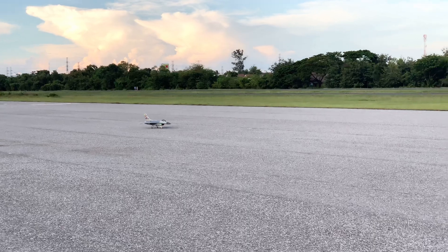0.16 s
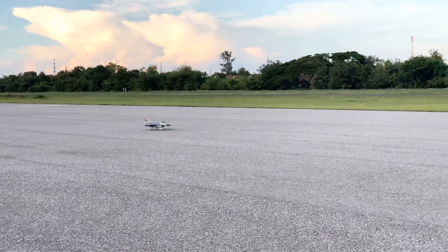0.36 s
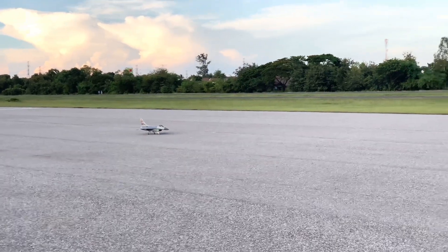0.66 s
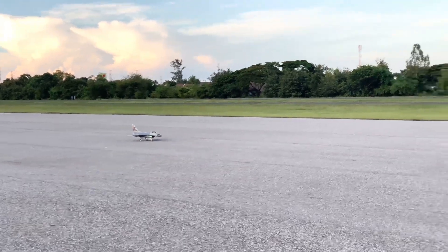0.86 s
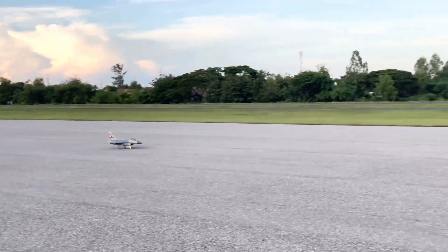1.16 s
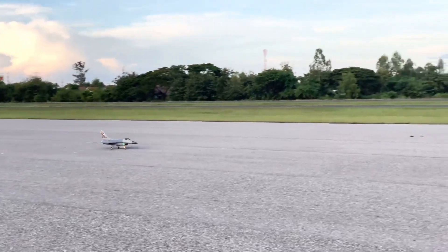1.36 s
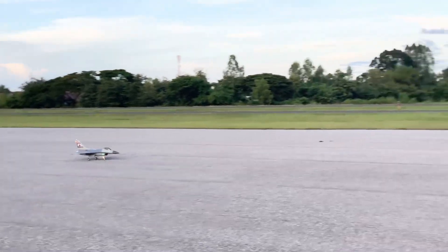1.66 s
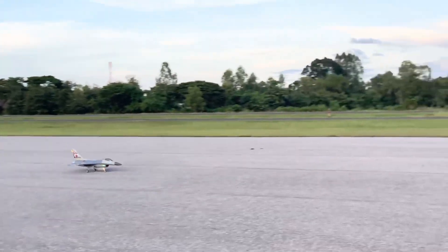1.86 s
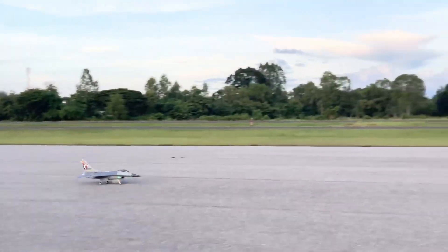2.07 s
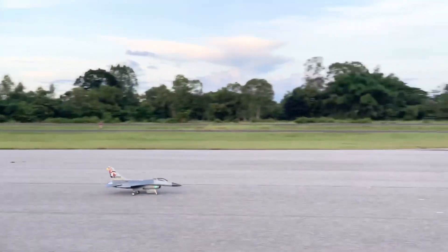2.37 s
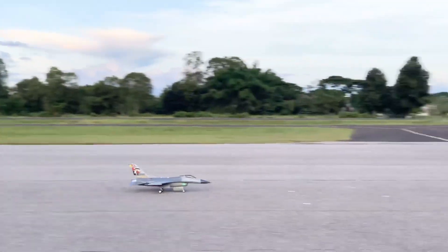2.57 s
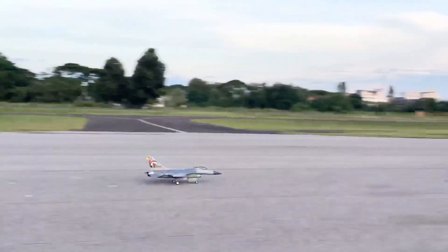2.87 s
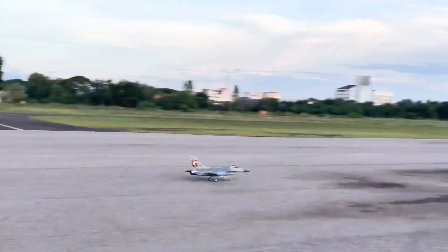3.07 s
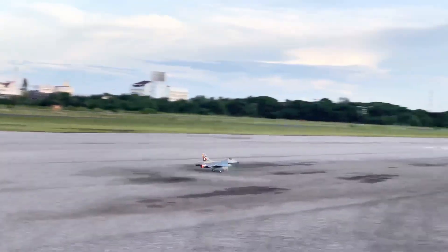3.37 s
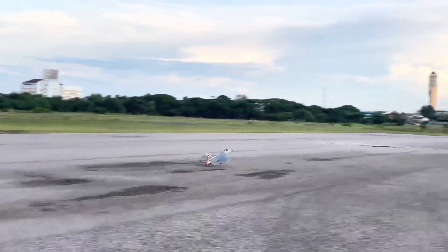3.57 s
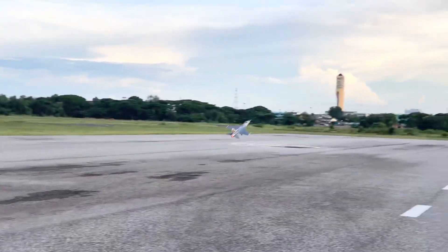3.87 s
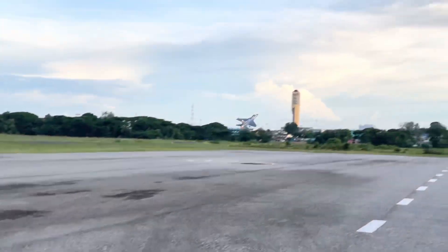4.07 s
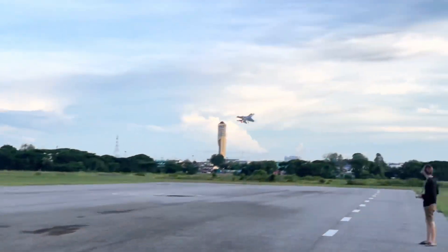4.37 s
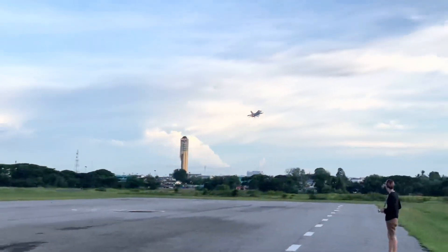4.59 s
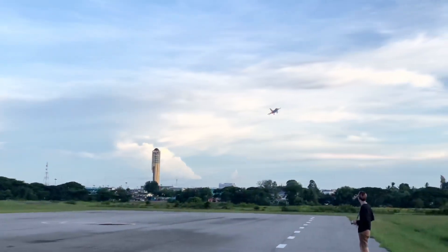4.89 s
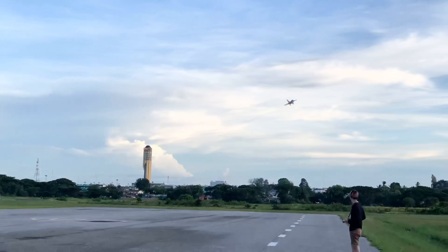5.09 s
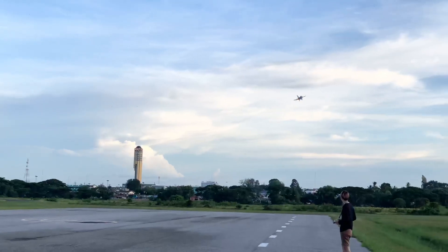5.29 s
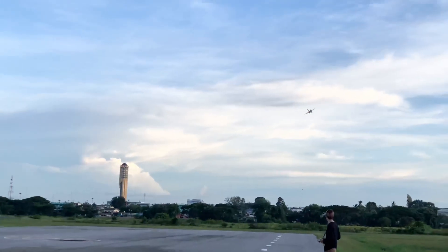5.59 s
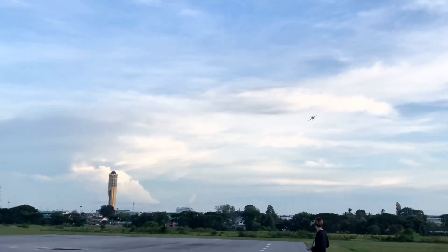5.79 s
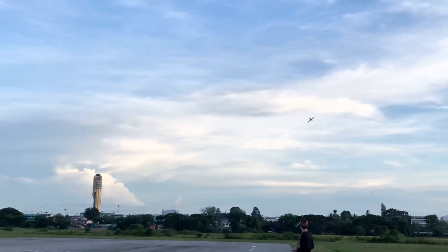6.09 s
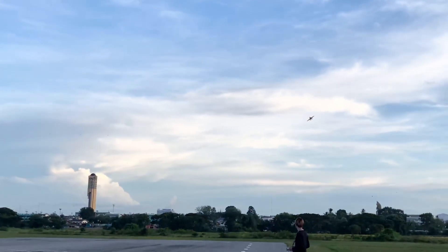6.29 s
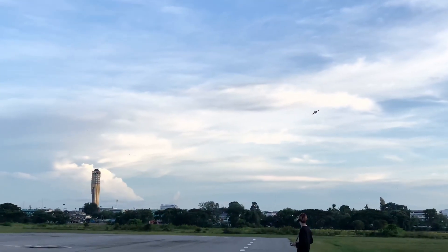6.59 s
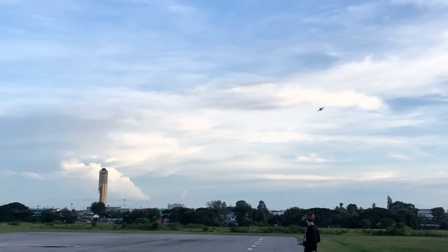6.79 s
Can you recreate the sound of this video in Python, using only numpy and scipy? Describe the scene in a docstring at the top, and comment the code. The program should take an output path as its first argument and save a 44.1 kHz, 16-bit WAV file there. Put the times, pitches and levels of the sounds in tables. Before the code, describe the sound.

A gust thumps the microphone at an open airfield. A model jet's ducted fan whines up in pitch over a rush of air, its tyres rumbling faintly on asphalt. It passes close with a piercing whistle and hiss, lifts off and fades into a hollow, sweeping roar. Wind buffets the hand-held microphone more strongly toward the end.

```python
"""A gust of wind thumps the microphone, then a model jet whines up to speed, rolls past and climbs away.
Its spinning shaft hums and its twelve fan blades whistle over exhaust roar, air rushing through the duct
and hiss from the blade tips. The tyres rumble on asphalt until lift-off. Then the echo from the ground
cancels some pitches and boosts others, so the jet sounds hollow. All along, wind buffets the hand-held
microphone, whose two openings (ports) give the left and right channels."""
import sys
import numpy as np
from scipy import signal
from scipy.io import wavfile
from scipy.ndimage import uniform_filter1d

SR = 44100
rng = np.random.default_rng(int(sys.argv[2]) if len(sys.argv) > 2 else 0)


def unload_wav(signal):
    """Save mono or channel-first audio to the path in sys.argv[1] as 16-bit WAV at rate SR, clipped to [-1, 1]."""
    wavfile.write(
        sys.argv[1],
        SR,
        np.round(np.clip(np.atleast_2d(signal).T, -1, 1) * 32767).astype(np.int16),
    )


N = 306406

# Tone colour of wind on the microphone (frequency [Hz], relative level [dB])
WIND_SPECTRUM = [(25, -21.5), (55, 9), (90, 1), (240, -9), (420, -20), (800, -33), (1200, -87)]
# The breeze between gusts (time [s], level [dB])
BREEZE_LEVEL = [(0, -41), (1, -41), (1.3, -39.5), (1.55, -43.5), (2.25, -42), (2.5, -77), (3.1, -49),
                (3.4, -43.5), (4.6, -42), (5.2, -29), (5.55, -42), (6.95, -33)]
# Gusts on the microphone (start [s], length [s], level [dB])
WIND_GUSTS = [(.01, 0.043, -21.5), (0.116, 0.051, -29.5), (0.257, 0.056, -36), (0.346, 0.067, -35),
              (0.566, 0.022, -29), (0.814, 0.084, -33), (1.227, 0.071, -33), (1.36, 0.14, -31.5),
              (1.611, 0.049, -30.5), (2.129, 0.036, -32.5), (2.303, 0.044, -27.5), (4.402, 0.09, -34),
              (4.664, 0.12, -27), (4.891, 0.073, -27), (5.035, 0.033, -19.5), (5.271, 0.064, -27.5),
              (5.428, 0.062, -36.5), (5.644, 1.28, -25.5), (5.765, 0.032, -27), (5.876, 0.21, -25),
              (6.307, 0.1, -25.5), (6.464, 0.07, -23.5), (6.61, 0.048, -20), (6.713, 0.099, -28)]
# Large eddies, swirls of air that burst on the microphone (time [s], relative level [dB], pitch [Hz])
BIG_EDDIES = [(1.438, -18, 287), (4.755, -16, 300), (4.876, -18, 298), (4.974, -16, 305),
              (5.212, -18.5, 280), (5.769, -16, 185), (5.843, -18.5, 258), (6.014, -9, 295),
              (6.198, -15.5, 304), (6.475, -16, 296), (6.559, -12.5, 372), (6.645, -11, 203),
              (6.731, -12.5, 265)]
# How fast the shaft turns, as heard (time [s], speed [Hz])
SHAFT_SPEED = [(0, 296), (.2, 375), (.35, 414), (.55, 466), (.72, 507), (1.1, 569), (1.3, 591.5),
               (1.45, 621), (1.64, 674), (1.85, 691), (2.05, 724), (2.25, 729), (2.45, 724), (3.3, 686),
               (3.7, 675.5), (4.45, 669.5), (4.68, 637), (4.9, 631), (5.4, 627), (5.98, 603.5),
               (6.95, 599.6)]
# Tone colours of exhaust, duct air, blade tips and tyres (frequency [Hz], relative level [dB])
ROAR_SPECTRUM = [(250, -13), (550, -9), (800, 3), (1080, 2), (1380, -2.5), (1700, -3), (2600, -9),
                 (4000, -63)]
RUSH_SPECTRUM = [(1200, -46), (2000, -1), (2800, 2.5), (3400, -3.5), (4000, -2.5), (4900, -3), (5800, -13),
                 (6500, -12), (7500, -9.5), (9000, -49)]
HISS_SPECTRUM = [(5500, -14), (6800, -9), (7800, -1), (9500, 3), (11000, -.5), (12000, -2), (13500, -4.5),
                 (15000, -19)]
TYRE_SPECTRUM = [(60, -1.5), (130, -12.5), (250, -2), (360, 1.5), (480, -3.5), (650, -59)]
# What sets each jet noise's loudness (side-on level [dB], rise per doubling of shaft speed [dB],
# nose-on boost [dB], tail-on boost [dB], loss in air [dB/m], amount of swell [factor])
ROAR_LOUDNESS = (-32.5, 10, 2.5, 3, 0.0381, 0.49)
RUSH_LOUDNESS = (-36.5, 12.5, 4.5, 11, 0.17, 1.25)
HISS_LOUDNESS = (-37, 17.5, 3.5, -3.5, 0.13, 1.02)
# The jet noise swells and sinks, each part by its own amount (time [s], relative level [dB])
JET_SWELL = [(0, 3.5), (.5, 4.5), (1.6, 3.5), (2.4, 1.3), (2.8, 0), (3.3, 0), (3.72, -2), (3.8, 0),
             (3.96, -1.5), (4.04, 0), (4.7, 2), (5.5, 3.5), (6.05, 4), (6.4, -5), (6.95, 2.7)]
# Shaft hum, blade whistle (beamed unevenly by the duct) and its overtone (time [s], level [dB])
HUM_LEVEL = [(.75, -62), (1, -48.5), (1.5, -42), (1.9, -40), (2.15, -36), (2.6, -34.5), (3.05, -38.5),
             (3.3, -49), (3.7, -49), (4.25, -59), (4.6, -56), (5.7, -57), (6, -65)]
WHISTLE_LEVEL = [(0, -66), (.1, -58), (.2, -62), (.28, -44), (.37, -66), (.52, -66), (.66, -54), (.82, -54),
                 (.95, -68), (1.06, -54), (1.4, -55), (1.7, -36), (1.97, -31), (2.25, -41), (2.45, -30),
                 (2.66, -30), (2.71, -38), (2.77, -26.5), (3.05, -23), (3.3, -29.5), (3.62, -35),
                 (3.82, -28), (4.3, -33), (4.6, -40), (5, -48), (5.15, -56), (5.27, -51), (5.58, -61),
                 (5.85, -52), (6.43, -63), (6.75, -52)]
OVERTONE_LEVEL = [(0, -74), (.38, -60), (.55, -57), (.78, -74), (1.07, -53), (1.3, -64)]
# Where the jet is heard from (time [s], direction [0 roll, 1 lift-off, 2 climb])
JET_DIRECTION = [(2.5, 0), (3.2, 1), (4.3, 1.3), (5, 2)]
# Left port's lead in each direction, shaped by the microphone body (frequency [Hz], phase [rad])
ROLL_LEAD = [(500, 0), (1400, 1.9), (2400, 1.8), (3100, 2.9), (3900, 5.8), (4500, 9.4), (5500, 11.7),
             (6500, 13.2), (7200, 11.5), (7500, 12.1)]
LIFT_LEAD = [(500, .6), (1400, 1.1), (1900, .3), (3100, 2.8), (4000, 4.3), (4500, 3.5), (5200, 4.4),
             (5800, 3.1), (6400, 1.2), (7200, .8), (7500, -1)]
CLIMB_LEAD = [(500, .4), (1400, .8), (1900, 0), (3100, 1.6), (3800, 1.7), (4500, 3), (5500, 3.4),
              (6200, 6.4), (7500, 6)]
# How much louder the left port is in the roll direction (frequency [Hz], left over right [dB])
LEFT_BOOST = [(600, 0), (1100, -2.5), (1400, 3), (1800, 8.5), (2400, -3), (2800, -4), (7000, -0.5),
              (9500, 0.5)]
# How alike the jet noise is at the two ports (frequency [Hz], likeness [0-1])
PORT_LIKENESS = [(150, .75), (1000, .96), (1600, .88), (2500, .96), (5000, .9), (8000, .97), (13000, .98)]
# The ground echo lags more as the jet rises (time [s], delay [ms])
ECHO_DELAY = [(3.55, .125), (3.71, .197), (3.87, .322), (3.99, .446), (4.27, .82), (4.48, 1.075),
              (4.65, 1.25), (4.85, 1.4), (5.13, 1.535), (5.7, 1.595)]
# A flatter path gives a fuller, brighter echo (time [s], base strength [0-1], sharp up to [Hz])
ECHO_FULLNESS = [(3.6, .4, 2500), (4.2, .7, 3500), (4.8, .95, 7500), (6.95, .99, 9000)]

BLADES, FULL_SPEED_HZ = 12, 700  # the loudness tables hold at this shaft speed
PASS_S, CLOSEST_M = 2.59, 10.3  # when and how near the jet goes by
START_M_S, TOP_M_S, SPEED_UP_S = 5.4, 19.4, 1.58
EDDIES_PER_S, EDDY_DB = 80., -5.5  # small eddies; level relative to the wind
BEAM_DB, BEAM_COS, BEAM_WIDTH = 7.5, 0.57, 0.31  # hiss beams out sideways, a little behind the wing
HUMP_DB, HUMP_WIDTH_HZ = 12.5, 1760  # from behind, hiss heaps up around the blade pitch
TYRE_DB, TYRE_DB_PER_DOUBLING, LIFT_OFF_S, TYRE_FADE_DB_PER_S = -34.5, 6, 3.78, 28
ECHO_START_S, ECHO_FADE_IN_S, HISS_ECHO_SHARE = 3.4, .3, .55
HOLLOWNESS = 1.2  # widens the dips in the echo, so the jet sounds more hollow
FRAME, HOP = 1024, 256  # length and spacing of the short slices of noise, in samples


def gain_of(db):
    return 10 ** (np.asarray(db) / 20)


def unit_rms(x):
    return x / np.sqrt(np.mean(x ** 2) + 1e-20)


def at_pitch(table, hz):
    """Look up a frequency table on a logarithmic scale."""
    f, value = np.transpose(table)
    return np.interp(np.log(hz + 1), np.log(f + 1), value)


def at_time(table, t):
    """Look up every column of a time table at times t."""
    times, *columns = np.transpose(table)
    return [np.interp(t, times, column) for column in columns]


def band_power(spectrum, hz, db):
    """Share out the power of level db among the frequencies of a spectrum."""
    power = gain_of(2 * at_pitch(spectrum, hz))
    return (power / power.sum())[:, None] * gain_of(2 * db)


def drift(t, top_hz):
    """A slow random wander of typical size 1, made of sines up to top_hz."""
    rates = np.geomspace(top_hz / 20, top_hz, 24)
    return unit_rms(sum(np.sin(2 * np.pi * (f * t + rng.random())) / np.sqrt(f) for f in rates))


def smooth_noise(width):
    """Random ups and downs, each about width samples long."""
    return unit_rms(uniform_filter1d(uniform_filter1d(rng.standard_normal(N), width), width))


def wind_strength(rise_s=0.014, fall_s=0.025):
    """A breeze with gusts that rise, hold and fall."""
    t = np.arange(N) / SR
    power = gain_of(at_time(BREEZE_LEVEL, t)[0]) ** 2
    for start, length, db in WIND_GUSTS:
        ramp = np.minimum((t - start) / rise_s, (start + length - t) / fall_s) + .5
        power += (gain_of(db) * np.clip(ramp, 0, 1) ** 2) ** 2
    return np.sqrt(power)


def wind(floor_db=-56.5, rumble_share_db=-4, rumble_hz=130):
    """Wind buffets both ports alike, over a deep rumble that differs at each."""
    hz = np.fft.rfftfreq(1024, 1 / SR)
    real, imag = rng.standard_normal((N // 128 + 5, len(hz), 3, 2)).T
    slices = (real + 1j * imag) * gain_of(at_pitch(WIND_SPECTRUM, hz))[:, None]
    noise, *rumble = signal.istft(slices, nperseg=1024, noverlap=896)[1][:, :N]
    low = signal.sosfiltfilt(signal.butter(2, 170., fs=SR, output="sos"), noise)
    lumps, flutter = smooth_noise(500), smooth_noise(220)
    buffet = low * gain_of(1.8 * lumps) + (noise - low) * gain_of(2.0 * lumps + 1.7 * flutter - 2.0)
    buffet /= np.sqrt(uniform_filter1d(buffet ** 2, 6000) + 1e-20)  # even out the slow swings
    rumble = unit_rms(signal.sosfilt(signal.butter(1, rumble_hz, fs=SR, output="sos"), rumble))
    strength = wind_strength()
    return strength * buffet + (gain_of(floor_db) + gain_of(rumble_share_db) * strength) * rumble


def eddy(hz):
    """One swirl of air: a short pressure swing whose pitch falls from above hz to below it."""
    cycles = hz * np.arange(1500) / SR
    falling = 2.167 * (1 - np.exp(-cycles / 1.286)) + 0.576 * cycles
    return cycles / 1.52 * np.exp(1 - cycles / 1.12) * np.sin(2 * np.pi * falling)


def eddy_pops():
    """Large eddies pop on the microphone; small ones patter, louder in stronger wind."""
    out = np.zeros(N)
    for start, db, hz in BIG_EDDIES:
        part = out[round(start * SR):][:1500]
        part += gain_of(db - 6.0) * rng.choice([-1, 1]) * eddy(hz)[:len(part)]
    pitches = np.geomspace(110., 240., 6)
    hits = rng.random((len(pitches), N)) < EDDIES_PER_S / len(pitches) / SR
    sizes = gain_of(EDDY_DB) * rng.standard_normal(N) * wind_strength()
    return out + sum(signal.oaconvolve(sizes * hit, eddy(hz))[:N] for hit, hz in zip(hits, pitches))


def jet_path(t):
    """The jet's speed [m/s], distance [m] and facing (a cosine: -1 nose-on, 1 tail-on)."""
    speed_to_gain = (TOP_M_S - START_M_S) * np.exp(-t / SPEED_UP_S)
    along = TOP_M_S * (t - PASS_S) + SPEED_UP_S * speed_to_gain * (1 - np.exp((t - PASS_S) / SPEED_UP_S))
    distance = np.hypot(along, CLOSEST_M)
    return TOP_M_S - speed_to_gain, distance, along / distance


def jet_level_db(t, side_db, doubling_db, nose_db, tail_db, loss_db_per_m, swell):
    """A jet noise's level follows shaft speed, facing and distance, and swells and sinks."""
    _, distance, facing = jet_path(t)
    speed_db = doubling_db * np.log2(at_time(SHAFT_SPEED, t)[0] / FULL_SPEED_HZ)
    beam_db = np.where(facing > 0, tail_db, nose_db) * facing ** 2
    loss_db = 20 * np.log10(distance / CLOSEST_M) + loss_db_per_m * (distance - CLOSEST_M)
    return side_db + speed_db + beam_db - loss_db + swell * at_time(JET_SWELL, t)[0]


def exhaust_roar(hz, t):
    """Power of the roar from the stream of air leaving the tail."""
    return band_power(ROAR_SPECTRUM, hz, jet_level_db(t, *ROAR_LOUDNESS))


def duct_rush(hz, t):
    """Power of the air rushing through the tube around the fan."""
    return band_power(RUSH_SPECTRUM, hz, jet_level_db(t, *RUSH_LOUDNESS))


def tyre_rumble(hz, t):
    """Power of the tyres on asphalt: it grows with speed and fades after lift-off."""
    speed, distance, _ = jet_path(t)
    speed_db = TYRE_DB_PER_DOUBLING * np.log2(speed / jet_path(PASS_S)[0])
    loss_db = 20 * np.log10(distance / CLOSEST_M) + TYRE_FADE_DB_PER_S * np.maximum(t - LIFT_OFF_S, 0)
    return band_power(TYRE_SPECTRUM, hz, TYRE_DB + speed_db - loss_db)


def blade_hiss(hz, t):
    """Power of the hiss from the blade tips, flickering on its way through gusty air."""
    facing = jet_path(t)[2]
    beam_db = BEAM_DB * np.exp(-((facing - BEAM_COS) / BEAM_WIDTH) ** 2)
    flicker_db = 0.6 * drift(t, 13.0)
    off_pitch_hz = hz[:, None] - BLADES * at_time(SHAFT_SPEED, t)[0]
    hump_db = HUMP_DB * np.maximum(facing, 0) * np.exp(-(off_pitch_hz / HUMP_WIDTH_HZ) ** 2)
    return band_power(HISS_SPECTRUM, hz, jet_level_db(t, *HISS_LOUDNESS) + beam_db + flicker_db + hump_db)


def jet_noise():
    """Roar, rush and hiss, coloured by the ground echo, plus the tyres."""
    t, hz = np.arange(N // HOP + 5) * HOP / SR, np.fft.rfftfreq(FRAME, 1 / SR)
    hiss = blade_hiss(hz, t)
    strength, sharp_hz = at_time(ECHO_FULLNESS, t)
    strength = np.minimum(strength * gain_of(.8 * drift(t, 15.) - .3), 1)  # gusts ruffle the echo
    blur = np.exp(-(hz[:, None] / sharp_hz) ** 2)  # the long exhaust plume blurs the treble echo
    air = exhaust_roar(hz, t) + duct_rush(hz, t)
    air *= ground_echo(hz[:, None], t, strength * blur) ** (2 * HOLLOWNESS)
    hiss *= ground_echo(hz[:, None], t, HISS_ECHO_SHARE * strength) ** 2
    return stereo_noise(air + hiss + tyre_rumble(hz, t), hz, t)


def stereo_noise(power, hz, t):
    """Turn power by frequency and time into slightly patchy noise, mostly alike at the two ports."""
    real, imag, own_real, own_imag, patches = rng.standard_normal((len(t), len(hz), 5)).T
    patches = unit_rms(uniform_filter1d(uniform_filter1d(patches, 12, 0), 14, 1))
    likeness = at_pitch(PORT_LIKENESS, hz)[:, None]
    right = real + 1j * imag
    left = likeness * right + np.sqrt(1 - likeness ** 2) * (own_real + 1j * own_imag)
    plain_rms = signal.istft(right / np.sqrt(len(hz)), nperseg=FRAME, noverlap=FRAME - HOP)[1].std()
    left_gain, right_gain = microphone_ports(hz[:, None], t[None])
    slices = np.array([left * left_gain, right * right_gain]) * np.sqrt(power) * gain_of(1.56 * patches)
    return signal.istft(slices, nperseg=FRAME, noverlap=FRAME - HOP)[1][:, :N] / plain_rms


def microphone_ports(hz, t, gap_ms=.3125):
    """Left and right gains, as complex numbers: the jet reaches each port with its own level and phase."""
    direction, = at_time(JET_DIRECTION, t)
    lead = sum(np.clip(1 - abs(direction - k), 0, 1) * np.exp(1j * np.interp(hz, *np.transpose(table)))
               for k, table in enumerate((ROLL_LEAD, LIFT_LEAD, CLIMB_LEAD)))
    above_hz = np.maximum(hz - ROLL_LEAD[-1][0], 0)  # above the tables, a plain delay takes over
    delay = np.exp(-2j * np.pi * above_hz * gap_ms / 1000)
    boost = gain_of(at_pitch(LEFT_BOOST, hz) * (1 - 0.33 * direction) / 2)
    return boost * delay * lead / (abs(lead) + 1e-9), 1 / boost


def fan_tones(top_hz=14300):
    """The unbalanced shaft hums, the passing blades whistle, and gusty air makes the tones waver."""
    coarse_t, t = np.arange(0, N + 64, 64) / SR, np.arange(N) / SR
    # the rotor's inertia smooths each change; its speed wobbles more while the motor pulls up
    shaft_hz = uniform_filter1d(at_time(SHAFT_SPEED, coarse_t)[0], size=40, mode="nearest")
    wobble = .0005 + abs(np.gradient(shaft_hz, coarse_t)) / 8e4
    turns = np.cumsum(np.interp(t, coarse_t, shaft_hz * (1 + wobble * drift(coarse_t, 60.)))) / SR
    echo_strength = np.interp(coarse_t, (4.6, 5.2), (.55, .3))
    out = np.zeros((2, N))
    for per_turn, levels, waver_db in ((1, HUM_LEVEL, .7), (BLADES, WHISTLE_LEVEL, 2.2),
                                       (2 * BLADES, OVERTONE_LEVEL, 4.)):
        hz = per_turn * shaft_hz
        size = np.sqrt(2) * gain_of(at_time(levels, coarse_t)[0] + waver_db * drift(coarse_t, 40.))
        size *= ground_echo(hz, coarse_t, echo_strength)
        size *= np.clip((top_hz - hz) / 700, 0, 1)  # tones die out towards top_hz
        wave = np.exp(2j * np.pi * per_turn * turns)
        for side, gain in enumerate(microphone_ports(hz, coarse_t)):
            out[side] += (np.interp(t, coarse_t, size * gain) * wave).real
    return out


def ground_echo(hz, t, strength):
    """Gain of direct sound plus its bounce off the runway: some pitches add up, others cancel."""
    cycles = hz * at_time(ECHO_DELAY, t)[0] / 1000 - 0.1  # the ground shifts the phase a little
    strength = strength * np.clip((t - ECHO_START_S) / ECHO_FADE_IN_S, 0, 1)
    return abs(1 + strength * np.exp(-2j * np.pi * cycles)) / np.sqrt(1 + strength ** 2)


def scene():
    return jet_noise() + fan_tones() + wind() + eddy_pops()


def record(dry):
    """The microphone drops the deepest bass and highest treble, and partway through makes the bass mono."""
    lowest_hz, highest_hz, mono_below_hz, mono_from_s = 42., 15700, 400, 4.45
    dry = signal.sosfilt(signal.butter(4, lowest_hz, "high", fs=SR, output="sos"), dry)
    side = (dry[0] - dry[1]) / 2
    side_bass = side - signal.sosfiltfilt(signal.butter(4, mono_below_hz, "high", fs=SR, output="sos"), side)
    mono = np.clip((np.arange(N) / SR - mono_from_s) / 0.075 + .5, 0, 1)
    dry = dry - np.outer([1, -1], side_bass * mono)
    padded = np.pad(dry, ((0, 0), (0, 300)), "reflect")
    treble_cut = signal.firwin(511, highest_hz, window=("kaiser", 9), fs=SR)
    return signal.oaconvolve(padded, treble_cut[None], "same")[:, :N]


dry = scene()
out = record(dry)
unload_wav(out)
```